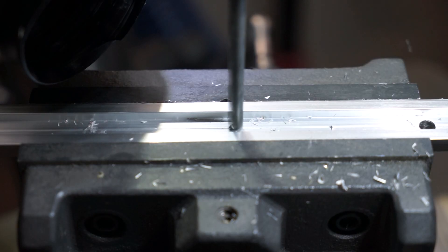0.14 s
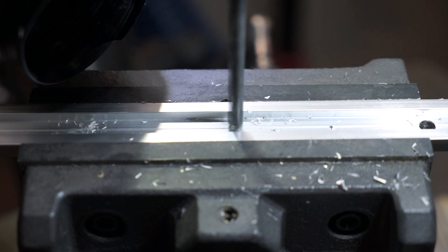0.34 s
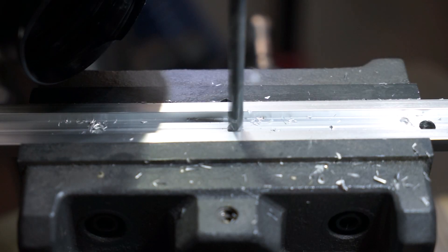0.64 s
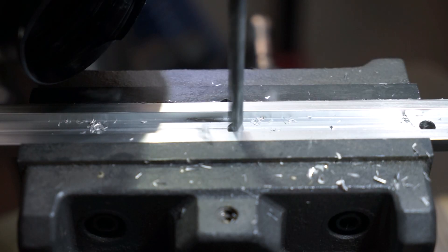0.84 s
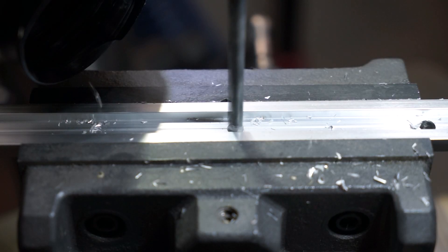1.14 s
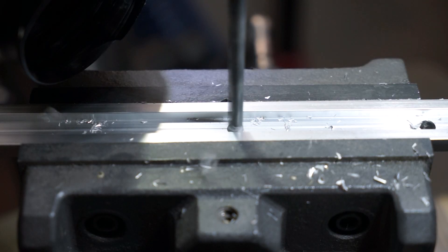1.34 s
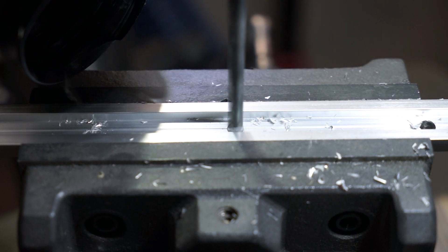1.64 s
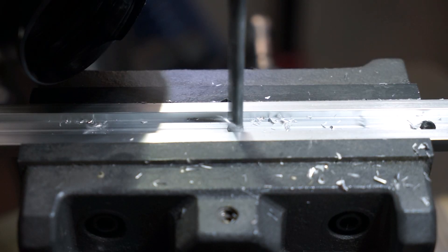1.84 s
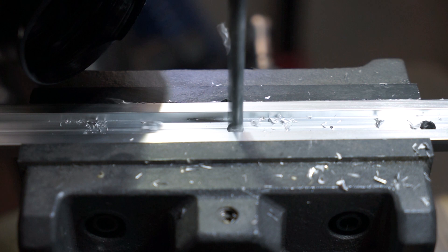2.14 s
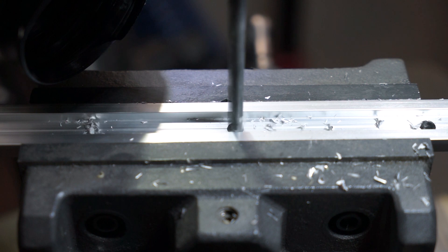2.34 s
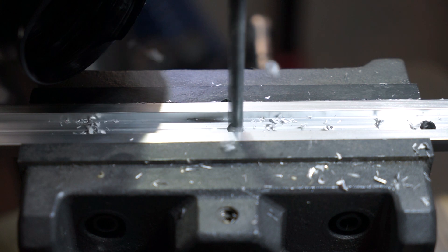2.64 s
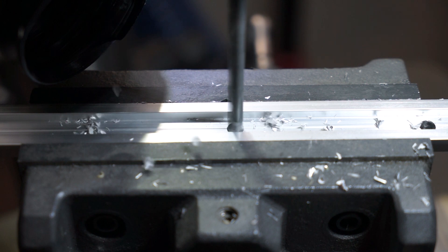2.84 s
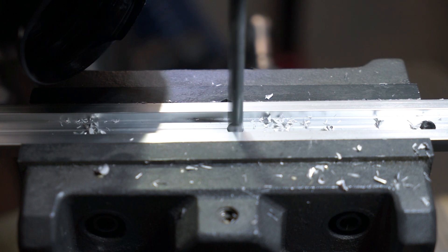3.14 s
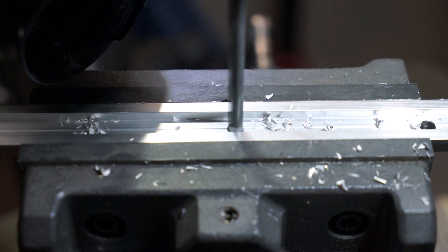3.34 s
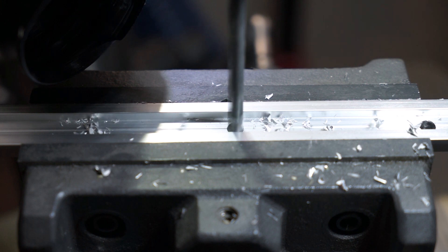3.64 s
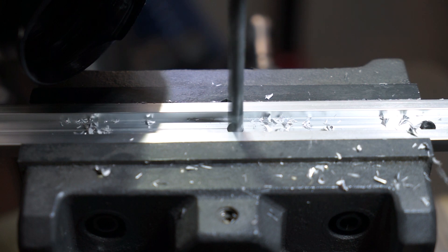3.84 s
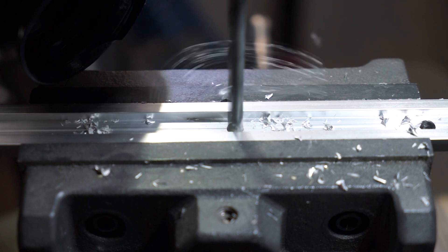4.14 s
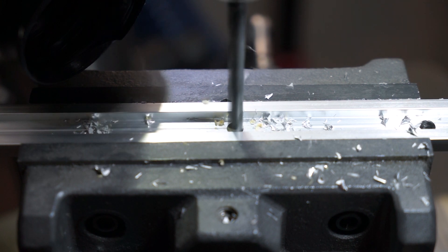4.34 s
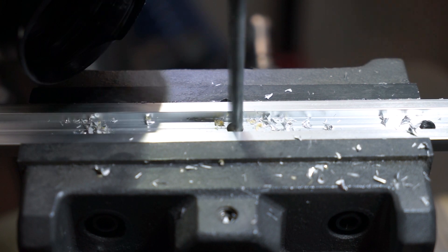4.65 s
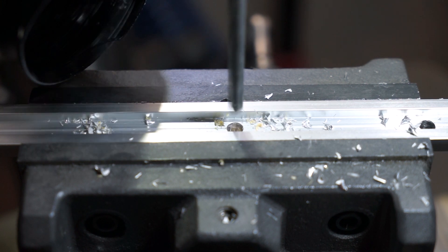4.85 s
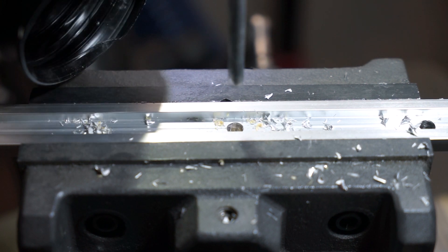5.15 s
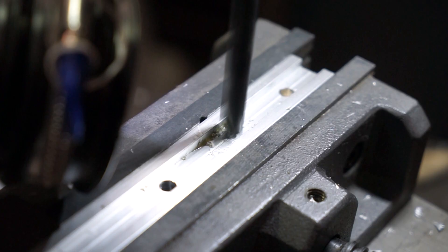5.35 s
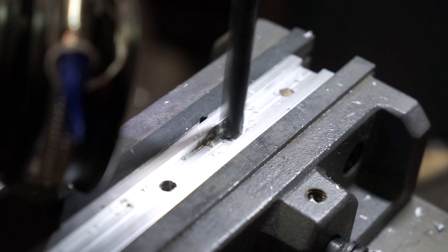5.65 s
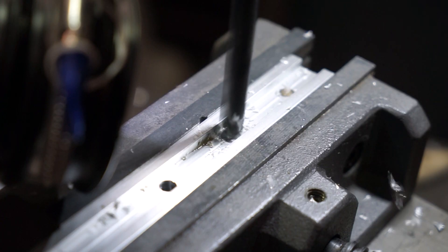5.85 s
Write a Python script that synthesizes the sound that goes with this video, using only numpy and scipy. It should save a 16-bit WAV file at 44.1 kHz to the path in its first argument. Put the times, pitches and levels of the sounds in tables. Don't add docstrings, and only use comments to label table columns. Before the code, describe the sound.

A bench drill's deep, fluttering rumble fills the stereo picture, leaning slightly left in the lows. Over it lie soft panel rattle, broadband clatter, a quiet airy cutting hiss and occasional tiny metal chip snaps. Stuttering scrapes mark the bit breaking through and catching the rim, then the hiss drops as it withdraws. A crossfade leads to a nearer angle with a slightly higher vise hum, growing hiss and faint whine.

```python
import sys
import numpy as np
from scipy import signal
from scipy.fft import rfft, irfft, dct
from scipy.io import wavfile
from scipy.ndimage import uniform_filter1d, minimum_filter1d

SR = 44100
rng = np.random.default_rng(int(sys.argv[2]) if len(sys.argv) > 2 else 0)


def ratio(d):
    e = np.asarray(d, float) / 20
    return 10 ** e


def dump_mix(stems):
    frames = np.atleast_2d(stems).T
    limited = np.clip(frames, -1, 1)
    pcm = np.round(limited * 32767).astype(np.int16)
    wavfile.write(sys.argv[1], SR, pcm)


N = 263718
T = np.arange(N) / SR
HZ = np.maximum(np.fft.rfftfreq(N, 1 / SR), 1)

# time in seconds, peak in dB, length in seconds.
BENCH_LURCHES = [(0.054, -27.5, 0.035), (0.147, -27, 0.065), (0.447, -26, 0.032), (0.575, -23.5, 0.028),
                 (0.967, -26, 0.027), (1.03, -27, 0.045), (1.076, -32.5, 0.025), (1.128, -37, 0.042),
                 (1.199, -34, 0.034), (1.302, -30.5, 0.039), (1.438, -32.5, 0.045), (1.532, -30.5, 0.037),
                 (1.598, -35.5, 0.03), (1.629, -29.5, 0.026), (1.729, -30.5, 0.036), (1.788, -28, 0.032),
                 (1.806, -38, 0.03), (2.005, -27.5, 0.032), (2.096, -31.5, 0.042), (2.162, -34, 0.036),
                 (2.327, -27.5, 0.04), (2.367, -35.5, 0.03), (2.598, -32.5, 0.094), (2.837, -32, 0.044),
                 (2.891, -32, 0.055), (3.178, -31.5, 0.024), (3.252, -29, 0.039), (3.392, -36, 0.043),
                 (3.658, -35.5, 0.031), (3.742, -32.5, 0.042), (3.883, -32.5, 0.035), (4.02, -36, 0.068),
                 (4.896, -32, 0.018), (4.983, -34, 0.063), (5.213, -37, 0.039), (5.299, -34, 0.046),
                 (5.359, -38.5, 0.026), (5.494, -43, 0.093), (5.582, -43.5, 0.068), (5.709, -40.5, 0.031)]
# time in seconds, pitch in Hz, peak in dB, length in seconds.
COLUMN_LURCHES = [(0.03, 159.5, -31, 0.076), (0.114, 160.5, -37.5, 0.041), (0.192, 160.4, -18.5, 0.059),
                  (0.3, 159.4, -28, 0.11), (0.419, 158, -22, 0.071), (0.479, 161.4, -30.5, 0.037),
                  (0.56, 164.1, -23, 0.11), (0.696, 160.3, -22.5, 0.086), (0.769, 158.3, -19, 0.038),
                  (0.822, 158, -30, 0.029), (0.863, 159.3, -19, 0.044), (0.915, 162.9, -21, 0.052),
                  (0.971, 159.7, -17, 0.056), (1.116, 163.9, -20, 0.034), (1.253, 158.2, -33, 0.025),
                  (1.432, 162.3, -25, 0.069), (1.51, 162.5, -32, 0.081), (1.707, 166.7, -25.5, 0.03),
                  (1.822, 158.8, -21.5, 0.13), (1.939, 161.8, -22.5, 0.034), (2.125, 158.3, -27.5, 0.023),
                  (2.273, 164.5, -26.5, 0.028), (2.328, 167.1, -27.5, 0.024), (2.498, 158.1, -19.5, 0.27),
                  (2.69, 160.6, -31, 0.039), (2.972, 162.1, -25.5, 0.055), (3.204, 157, -19, 0.039),
                  (3.34, 162.8, -30, 0.23), (3.49, 160.0, -21, 0.06), (3.579, 159.4, -26.5, 0.027),
                  (3.635, 158.7, -24, 0.058), (3.793, 163.8, -23.5, 0.057), (3.846, 160.5, -28.5, 0.035),
                  (3.925, 158.1, -26.5, 0.04), (4.096, 158.9, -25.5, 0.051), (4.151, 166.3, -34, 0.028),
                  (4.213, 160.7, -32.5, 0.042), (4.29, 164.9, -29, 0.041), (4.473, 159.7, -29.5, 0.094),
                  (4.746, 159.7, -25, 0.038), (4.996, 156.9, -25, 0.08), (5.197, 158.2, -24, 0.046),
                  (5.378, 163.8, -36, 0.09), (5.431, 162.0, -36, 0.043), (5.493, 159, -36.5, 0.037),
                  (5.56, 163.4, -42.5, 0.031), (5.619, 160.8, -40, 0.041), (5.834, 161.6, -33, 0.043)]
# time in seconds, pitch in Hz, peak in dB, length in seconds.
TABLE_LURCHES = [(0.012, 193, -24.3, 0.047), (0.108, 195, -25, 0.047), (0.183, 191.5, -21, 0.024),
                 (0.222, 189.8, -22, 0.038), (0.357, 190.5, -24.5, 0.07), (0.458, 186.8, -17, 0.03),
                 (0.705, 191.5, -21, 0.051), (0.826, 189, -19.5, 0.04), (0.88, 187, -17, 0.044),
                 (0.937, 187.1, -20.5, 0.037), (0.994, 187.4, -19.5, 0.05), (1.201, 187.3, -19, 0.062),
                 (1.422, 188.1, -22.5, 0.12), (1.654, 185.6, -23, 0.14), (1.725, 185.4, -19.5, 0.031),
                 (1.796, 186.7, -25, 0.057), (1.867, 196.3, -23.5, 0.045), (1.937, 182.0, -22, 0.036),
                 (2.255, 190.1, -22.5, 0.046), (2.3, 189.6, -26.5, 0.026), (2.336, 189.2, -18.5, 0.041),
                 (2.405, 186.1, -26.5, 0.27), (2.675, 187, -20.5, 0.029), (2.779, 193.1, -22, 0.027),
                 (2.898, 187.9, -21, 0.016), (2.967, 193.6, -21, 0.02), (3.151, 193.4, -21.5, 0.038),
                 (3.204, 191.3, -25.5, 0.017), (3.241, 192.5, -22, 0.019), (3.342, 190.3, -24.5, 0.034),
                 (3.422, 188.0, -23.5, 0.094), (3.47, 190.2, -19.5, 0.027), (3.536, 189.3, -19.5, 0.054),
                 (3.657, 192.3, -20.5, 0.029), (3.704, 194.1, -19.5, 0.022), (3.86, 189.8, -27, 0.055),
                 (3.99, 187.2, -24, 0.041), (4.048, 187.2, -21, 0.061), (4.187, 185.9, -19, 0.099),
                 (4.244, 188.2, -21, 0.023), (4.411, 190, -20.5, 0.052), (4.491, 189.4, -25, 0.066),
                 (4.532, 186.6, -24, 0.046), (4.71, 189.1, -24, 0.036), (4.873, 186.5, -21.5, 0.042),
                 (4.958, 190.1, -22.5, 0.085), (5.245, 188, -26, 0.12), (5.369, 193.2, -32.5, 0.019),
                 (5.445, 189, -25.5, 0.05), (5.541, 188.6, -35, 0.02)]
# time in seconds, pitch in Hz, peak in dB, length
# in seconds.
VISE_LURCHES = [(0.068, 244.9, -27, 0.031), (0.117, 250.0, -35.5, 0.044), (0.206, 244.2, -35.5, 0.044),
                (0.351, 244.0, -31, 0.042), (0.395, 255.9, -29, 0.018), (0.469, 237.4, -35, 0.056),
                (0.555, 244.3, -32, 0.012), (0.602, 242.1, -27, 0.023), (0.68, 248.1, -29, 0.015),
                (0.836, 236.1, -32.5, 0.05), (0.891, 236.5, -33, 0.11), (1.028, 246.5, -36, 0.022),
                (1.094, 244.1, -35.5, 0.057), (1.25, 246.0, -37.5, 0.044), (1.304, 245.3, -31, 0.034),
                (1.35, 238.3, -28, 0.059), (1.707, 244.9, -36.5, 0.05), (1.775, 239.3, -32, 0.023),
                (2.217, 241.0, -38, 0.027), (2.46, 253.3, -32, 0.026), (2.502, 242.8, -36.5, 0.033),
                (2.582, 248.5, -36, 0.024), (3.185, 247.6, -32, 0.023), (3.627, 244.9, -34.5, 0.017),
                (3.68, 245.8, -37.5, 0.026), (3.853, 250.8, -29, 0.048), (3.948, 242.5, -35, 0.022),
                (4.129, 250.1, -33, 0.051), (4.169, 248.7, -36, 0.041), (4.664, 247.9, -35, 0.026),
                (4.711, 246.8, -30.5, 0.027), (5.154, 256.2, -31, 0.025), (5.285, 251.1, -26.5, 0.084),
                (5.345, 253.2, -24, 0.06), (5.386, 247.3, -32.5, 0.046), (5.456, 247.3, -31, 0.013),
                (5.495, 282.2, -30, 0.055), (5.543, 253.1, -26.5, 0.025), (5.639, 254.9, -20, 0.026),
                (5.697, 249.3, -24, 0.048), (5.741, 245.9, -25, 0.024), (5.791, 254.9, -30, 0.019),
                (5.848, 254.1, -31.5, 0.029), (5.875, 240.8, -22.5, 0.025), (5.945, 237.3, -23, 0.14)]
BENCH_HZ = 117.65
BENCH_REST_DB, COLUMN_REST_DB, TABLE_REST_DB = -44, -35.5, -32.5
VISE_REST_DB, CLOSER_VISE_REST_DB = -48.5, -44

# multiple of the rotor turn, level in dB.
HUM = [(2, -42.5), (4, -51), (5, -51), (6, -51), (8, -72), (10, -62.5), (12, -65), (13, -54.5)]
ROTOR_HZ = 59.16
# frequency in Hz, density in dB per Hz.
RUMBLE = [(15, -86), (25, -52.5), (59, -37), (100, -11.5), (129, -10), (146, -9.5), (172, -6), (198, -3),
          (225, -8), (255, -13.5), (309, -23), (325, -27.5), (355, -26.5), (383, -33), (520, -56),
          (680, -76), (1140, -120)]
RUMBLE_DB, RUMBLE_SAG_DB_PER_S = -30.5, 0.37

# time in seconds, level in dB.
FEED = [(0, -3), (.35, -5), (.95, 0.5), (1.25, -0.5), (1.65, 1.5), (2.2, -0.5), (2.8, 1), (3.2, 0),
        (3.9, 2), (4.15, 4.5), (4.42, -3), (4.65, -4), (5.06, -8.5), (5.98, -6.5)]
# frequency in Hz, width in Hz, level in dB.
CASING_MODES = [(550, 42, -10.5), (593.5, 44, -1), (631.3, 22, -1.5), (656, 130, -6), (772, 19, 3.5),
                (794, 34, 0), (1028, 30, -1), (1120, 110, -7.5), (1175, 53, -8.5), (1403, 80, -6.5),
                (1465, 60, -7.5)]
CASING_DB, CASING_DB_PER_FEED_DB = -46.5, 0.3
# frequency in Hz, density in dB per Hz.
WASH = [(240, -42), (400, -17.5), (496, -17.5), (773, 0), (887, -9.5), (1170, -4), (1660, -14.5),
        (2000, -14.5), (2480, -19.5), (4100, -25), (15600, -40)]
WASH_DB, WASH_DB_PER_FEED_DB = -48.87, 0.52

# frequency in Hz, width in Hz, level in dB.
BIT_MODES = [(3430, 220, -4.5), (3870, 300, -3), (4120, 310, 2), (4379, 22, 7), (4400, 180, 2),
             (4787, 20, 0.5), (2622, 25, 2.5), (3382, 30, 1.5), (4690, 60, -4), (5130, 470, -10.5),
             (5554, 16, -5.5), (7800, 1700, -14.5)]
# time in seconds, level in dB.
GRIP = [
    (0, -1.5),
    (4.21, 1.5),
    (4.25, -4),
    (4.62, 5.5),
    (4.67, -19),
    (5.98, -19),
]
CUT_DB = -64.5
SPINDLE_HZ, SPINDLE_MARK_S = 39.38, 4.543
# frequency in Hz, width in Hz, level in dB.
RAIL_MODES = [(1770, 22, -4), (1867, 15, 3.5), (1870, 49, -3), (2340, 18, -6.5), (2004, 160, 3),
              (2190, 140, -10.5)]
# time in seconds, peak in dB, length in seconds.
RAIL_SWELLS = [(.9, 2, 0.29), (1.448, 0, 0.39), (2.35, 1, 0.3), (2.65, -2, .35), (3.0, -1, 0.35)]
RAIL_DB, RAIL_DB_PER_FEED_DB, RAIL_SAG_DB_PER_S = -57, 0.56, 1.5

# frequency in Hz, density in dB per Hz.
AIR = [(3530, -28), (6000, 5.5), (7680, 3.5), (8390, 1.5), (10200, 1.5), (12300, 2.5), (15600, -11.5)]
AIR_DB, AIR_DB_PER_FEED_DB, SECOND_AIR_DB = -74, 0.54, -19.5
# start in seconds, # length in
# seconds, frequency in Hz, width in Hz, level in dB.
SCRAPES = [(0.446, 1.2, 7800, 1203, -74), (4.205, .19, 7460, 6495, -64), (4.226, 0.061, 5560, 1202, -63.5),
           (4.273, 0.059, 2555, 1700, -53), (4.277, 0.023, 4430, 1300, -53), (4.288, 0.033, 5200, 700, -54),
           (4.292, .04, 13160, 600, -70), (4.315, 0.049, 5300, 750, -53.5),
           (4.322, 0.017, 4270, 692.6, -58.5), (4.36, 0.068, 4700, 1800, -66.5),
           (4.416, 0.041, 4250, 1016, -56), (4.42, .1, 2300, 1699, -57), (4.41, .13, 5000, 2400, -65),
           (4.444, .018, 4490, 1100, -58), (4.465, .015, 4260, 600, -58), (4.479, 0.066, 4400, 1800, -64),
           (4.538, .07, 8970, 6020, -67), (4.541, .022, 4467, 900, -52), (4.543, 0.088, 1870, 1190, -52.5),
           (4.546, 0.046, 7140, 600, -65), (4.553, .06, 12750, 550, -74), (4.566, .018, 4460, 900, -49),
           (4.581, .042, 4400, 1699, -52.5), (4.722, .04, 12900, 400, -72),
           (5.675, 0.06, 6510, 3990, -68.5), (5.783, 0.033, 3200, 1300, -59), (5.84, .05, 2070, 198.6, -57)]
# time in seconds, peak in dB, ring in Hz, tail in seconds, snap share.
CHIPS = [(2.035, -55, 11300, 0.02, 0.85), (2.04, -54.5, 11340, .012, .8), (2.037, -57, 6800, .03, .2),
         (2.2325, -56, 11270, 0.014, 1.2), (2.2693, -52, 7014, 0.03, 0.8), (2.238, -55, 11030, .01, .7),
         (2.274, -56.5, 11200, 0.036, .3), (2.291, -53.5, 10710, .015, .7), (2.314, -54.5, 7300, .015, .3),
         (2.7889, -57, 11000, 0.034, 0.5), (2.8, -55, 6201, .03, 0.5), (2.848, -56, 10990, .02, .4),
         (2.99, -57.5, 11210, .012, .3), (3.171, -52.5, 10560, 0.0067, 2), (3.1765, -47.5, 12540, 0.025, 1),
         (3.176, -52.5, 14560, .02, -0.5), (3.218, -53.5, 10500, 0.02, .4), (3.405, -60, 11000, 0.027, .5),
         (3.474, -51.5, 9850, 0.011, 0.5), (3.551, -55, 6030, .03, -0.5), (3.84, -55.5, 6560, .04, -1.5),
         (4.048, -55.5, 11030, 0.02, 1), (4.055, -55, 6440, .03, 2), (4.215, -60, 9020, 0.04, -0.7),
         (4.25, -56, 12560, .015, .4), (4.296, -61, 13030, .008, 1), (4.3215, -61.5, 7500, 0.01, 1.5),
         (4.555, -61, 12370, 0.0073, .8), (4.565, -58, 10470, 0.01, 1.5), (4.727, -63, 12740, 0.044, 1.8),
         (5.6906, -62, 9330, 0.072, 0.9)]

# time in seconds, level in dB.
SECOND_FADE = [(0, -51.5), (4.85, -43.5), (5.05, -4.5), (5.3, -1.5), (5.6, -1), (5.98, 0)]
# frequency in Hz, density in dB per Hz.
CLOSER_RUMBLE = [(15, -55.5), (25, -27), (80, -32), (198, -13.5), (223, -8), (290, -8), (353, -18),
                 (549, -34.5), (620, -50), (810, -87), (1360, -120)]
# time in seconds, peak in dB, length in seconds.
CLOSER_SURGES = [(5.063, -48.5, 0.03), (5.259, -41, 0.035), (5.36, -32, 0.1), (5.484, -33, 0.076),
                 (5.679, -33, 0.15), (5.824, -32.5, 0.1), (5.945, -32.5, .12)]
CLOSER_RUMBLE_DB, SURGE_REST_DB = 4, -40.5
# frequency in Hz, width in Hz, level in dB.
CLOSER_RING = [(1190, 58, -52.5), (2070, 89, -65.5), (1655, 100, -64.5)]
# time in seconds, level in dB.
CLOSER_CUT = [(5.0, -76), (5.17, -63.5), (5.45, -59), (5.62, -59), (5.69, -56.5), (5.88, -56.5),
              (5.97, -53.5)]
# frequency in Hz, density in dB per Hz.
CLOSER_HISS = [(400, -10.5), (550, -4.5), (700, -11.5), (900, -4), (1100, 0), (1350, -10), (1600, -6.5),
               (2100, -11), (3300, -19.5), (4500, -25), (8000, -34), (15600, -43)]
CLOSER_HISS_DB = 8

# frequency in Hz, likeness from 0 to 1.
LIKENESS = [(25, .9), (60, .98), (205, .985), (250, .8), (500, .42), (1000, .52), (2000, .4), (5000, .26),
            (12000, .3)]
# frequency in Hz, excess in dB.
LEFT_MORE = [(60, 6), (110, 6.5), (200, 4), (380, 3), (700, 0), (1290, 0.5), (2380, -2), (4400, 2),
             (8120, -2), (15000, -2)]
WIDER_DB, LEAN_DB = 3.5, 1.2
LIMIT_DB, LIMIT_S = -9.5, 0.012


def unit(x):
    return x / np.sqrt(np.mean(x ** 2, axis=-1, keepdims=True))


def curve(table):
    s, db = np.transpose(table)
    return np.interp(T, s, db)


def along_hz(table):
    hz, value = np.transpose(table)
    return np.interp(np.log(HZ), np.log(hz), value)


def modes(table):
    power = 0
    for hz, width_hz, db in table:
        power = power + (ratio(db) / (1 + (2 * (HZ - hz) / width_hz) ** 2)) ** 2
    return np.sqrt(power)


def shaped(gain, drive=1):
    noise = rng.standard_normal((2, N)) * drive
    return unit(irfft(rfft(noise) * gain, N))


def walk(rate_hz):
    k = int(SR / rate_hz)
    steps = np.repeat(rng.standard_normal((2, N // k + 1)), k, axis=1)
    x = uniform_filter1d(uniform_filter1d(steps, k), k)[:, :N]
    return x / x.std()


def grit(per_s, spread_db, smear_s):
    shocks = (rng.random(N) < per_s / SR) * ratio(spread_db * rng.random(N))
    return 1 + signal.lfilter([1], [1, -np.exp(-1 / (smear_s * SR))], shocks)


def spindle(depth):
    turn = ((T - SPINDLE_MARK_S) * SPINDLE_HZ) % 1
    return 1 + depth * np.exp(-turn / 0.4) * np.clip(turn / 0.08, 0, 1)


def repeats(share):
    return 1 / abs(1 - np.clip(share, 0, 0.9) * np.exp(-2j * np.pi * HZ / SPINDLE_HZ))


def lurches(s, db, length_s, rest):
    power = rest ** 2
    for at, top, span in zip(s, ratio(db), length_s):
        power = power + top ** 2 * np.exp(-(2.69 * (T - at) / max(span, 0.01)) ** 2)
    return np.sqrt(power)


def swing(hz, table, rest, wobble_hz, flicker_db):
    phase = 2 * np.pi * np.cumsum(hz + wobble_hz * walk(30), axis=1) / SR
    size = lurches(*table, rest * ratio(1.9 * walk(14)[0]))
    return np.sqrt(2) * size * ratio(flicker_db * walk(25)) * np.cos(phase)


def pitched(table, rest, wobble_hz, flicker_db):
    s, hz, db, length_s = np.transpose(table)
    return swing(np.interp(T, s, hz), (s, db, length_s), rest, wobble_hz, flicker_db)


def frame(first, second):
    vise_rest = first * ratio(VISE_REST_DB) + second * ratio(CLOSER_VISE_REST_DB)
    bench = swing(BENCH_HZ, np.transpose(BENCH_LURCHES), first * ratio(BENCH_REST_DB), 7.04, 0.38)
    column = pitched(COLUMN_LURCHES, first * ratio(COLUMN_REST_DB), 2.536, 0.42)
    table = pitched(TABLE_LURCHES, first * ratio(TABLE_REST_DB), 3.972, 0.57)
    vise = pitched(VISE_LURCHES, vise_rest, 4.415, 0.72)
    return bench + column + table + vise


def motor():
    turn = 2 * np.pi * np.cumsum(ROTOR_HZ + 0.2503 * walk(3)[0]) / SR
    out = np.zeros((2, N))
    for multiple, db in HUM:
        start = rng.uniform(0, 2 * np.pi, (2, 1))
        out += np.sqrt(2) * ratio(db + 0.87 * walk(9)) * np.sin(round(multiple) * turn + start)
    return out


def belt_rumble():
    level_db = RUMBLE_DB - RUMBLE_SAG_DB_PER_S * T + 1.9 * walk(30)[0]
    return ratio(level_db) * shaped(ratio(along_hz(RUMBLE)))


def casing(feed_db):
    level_db = CASING_DB + CASING_DB_PER_FEED_DB * feed_db + 0.83 * walk(6.2)
    return ratio(level_db) * shaped(modes(CASING_MODES), grit(300, 2.5, 0.00052))


def wash(feed_db):
    level_db = WASH_DB + WASH_DB_PER_FEED_DB * feed_db
    return ratio(level_db) * shaped(ratio(along_hz(WASH)) * repeats(0.1))


def cut(feed_db):
    level_db = CUT_DB + feed_db + curve(GRIP) + 0.9 * walk(16)
    return ratio(level_db) * shaped(modes(BIT_MODES), spindle(0.33) * grit(140, 3.2, 0.00073))


def rail(feed_db):
    level_db = RAIL_DB + RAIL_DB_PER_FEED_DB * feed_db - RAIL_SAG_DB_PER_S * T
    level_db = level_db + 1.2 * walk(3.1) + 1.2 * walk(22)
    swell = lurches(*np.transpose(RAIL_SWELLS), ratio(-0.5))
    return ratio(level_db) * swell * shaped(modes(RAIL_MODES) * repeats(0.34), spindle(0.82))


def cutting_air(feed_db, second):
    level = ratio(AIR_DB + AIR_DB_PER_FEED_DB * feed_db) + second * ratio(curve(CLOSER_CUT) + SECOND_AIR_DB)
    return level * ratio(0.9 * walk(9.8)) * shaped(ratio(along_hz(AIR)), grit(25, 3.0, 0.003))


def draught(second):
    return ratio(-69 + 9 * second ** 3) * shaped(modes([(35.2, 30, 0)]))


def scrapes():
    out = np.zeros((2, N))
    bite = spindle(0.94) * ratio(1.4 * walk(150)[0])
    bite = bite * (1 + 0.4 * np.cos(8 * np.pi * SPINDLE_HZ * (T - SPINDLE_MARK_S - 0.0015)))
    for s, length_s, hz, width_hz, db in SCRAPES:
        u = np.arange(int(1.6 * length_s * SR)) / (length_s * SR)
        i = int(s * SR)
        band_hz = [hz - width_hz / 2, hz + width_hz / 2]
        sos = signal.butter(3, band_hz, "band", fs=SR, output="sos")
        noise = rng.standard_normal((2, len(u))) * bite[i:i + len(u)]
        envelope = np.clip(5.9 * u, 0, 1) * np.exp(-u ** 2.8)
        out[:, i:i + len(u)] += ratio(db) * envelope * unit(signal.sosfilt(sos, noise))
    return out


def chips():
    out = np.zeros((2, N))
    t = np.arange(SR // 5) / SR
    for s, db, hz, tail_s, snap_share in CHIPS:
        crackle = ratio(3.0 * walk(500)[0, :len(t)])
        snap = snap_share * np.exp(-t / 0.00061)
        drag = 0.22 * crackle * (1 - np.exp(-t / 0.002)) * np.exp(-t / max(tail_s, 0.005))
        puff = rng.standard_normal((2, len(t))) * (snap + drag)
        sos = signal.butter(2, [0.8 * hz, 1.2 * hz], "band", fs=SR, output="sos")
        i = int(s * SR)
        out[:, i:i + len(t)] += (2.9 * ratio(db) * signal.sosfilt(sos, puff))[:, :N - i]
    return out


def closer_angle(second):
    surge = lurches(*np.transpose(CLOSER_SURGES), ratio(SURGE_REST_DB))
    rumble = surge * ratio(CLOSER_RUMBLE_DB) * shaped(ratio(along_hz(CLOSER_RUMBLE)))
    hiss_db = curve(CLOSER_CUT) + CLOSER_HISS_DB + 1.4 * walk(15)
    hiss = ratio(hiss_db) * shaped(ratio(along_hz(CLOSER_HISS)), grit(300, 1.5, 0.00076))
    ring_db = max(db for _, _, db in CLOSER_RING) - 4.5
    ring = ratio(ring_db) * shaped(modes(CLOSER_RING))
    whine = ratio(-55.5) * np.sin(2 * np.pi * np.cumsum(1172 + 8.3 * walk(40), axis=1) / SR)
    return np.clip(2.7 * second, 0, 1) * (rumble + hiss) + second ** 2 * (ring + whine)


def ports(sound):
    direct, diffuse = dct(sound, norm="ortho")
    hz = np.arange(N) * SR / (2 * N)
    alike = np.clip(np.interp(hz, HZ, along_hz(LIKENESS)), 0, 1)
    skew = ratio(np.interp(hz, HZ, along_hz(LEFT_MORE)) / 2)
    pair = np.array([skew, 1 / skew])
    opposed = np.sqrt((1 - alike) / 2) * diffuse * np.array([[1], [-1]])
    both = np.sqrt((1 + alike) / 2) * direct + opposed
    return dct(both * pair / pair.mean(axis=0), type=3, norm="ortho")


def limit(x):
    size = int(LIMIT_S * SR)
    gain = np.minimum(1, ratio(LIMIT_DB) / (abs(x).max(axis=0) + 1e-9))
    return x * uniform_filter1d(minimum_filter1d(gain, size=size), size=size)


def scene():
    feed_db = curve(FEED)
    second = ratio(curve(SECOND_FADE))
    first = np.sqrt(np.clip(1 - second ** 2, 0, 1))
    wider = ratio(WIDER_DB * second * np.array([[0], [1]]))
    lean = ratio(LEAN_DB * second * np.array([[0.5], [-0.5]]))
    shaken = lean * ports(wider * (frame(first, second) + closer_angle(second)))
    machine = motor() + belt_rumble() + casing(feed_db) + wash(feed_db)
    work = cut(feed_db) + rail(feed_db)
    debris = cutting_air(feed_db, second) + scrapes() + chips()
    return shaken + ports(first * (machine + work) + debris) + draught(second)


def roll_off(x):
    return signal.sosfilt(signal.butter(12, 15710, fs=SR, output="sos"), x)


def record(dry):
    fade = np.sin(np.clip((N / SR - T) / 0.003, 0, 1) * np.pi / 2)
    return roll_off(limit(dry) * fade)


dry = scene()
out = record(dry)
dump_mix(out)
```